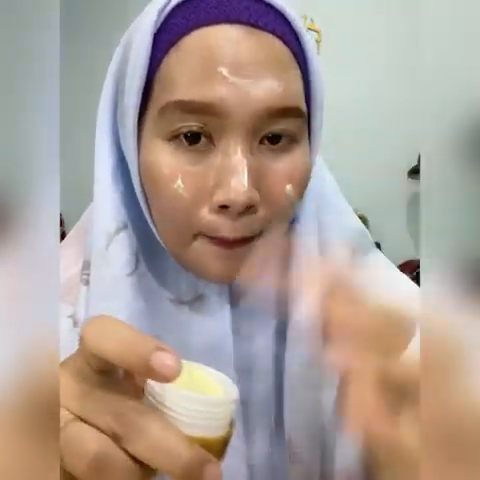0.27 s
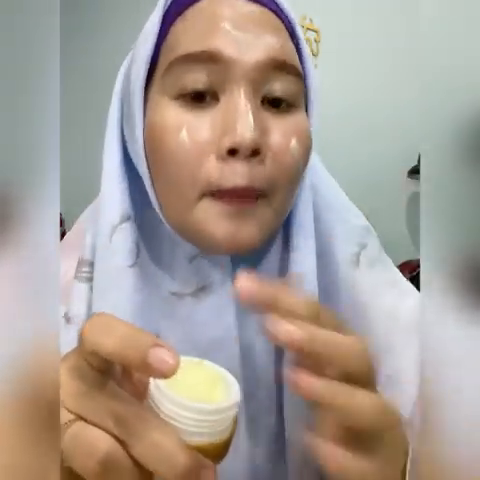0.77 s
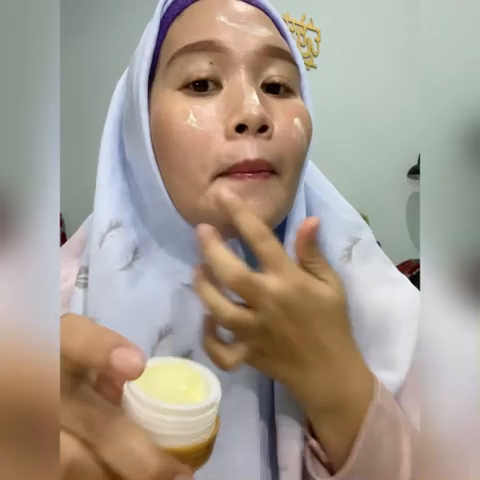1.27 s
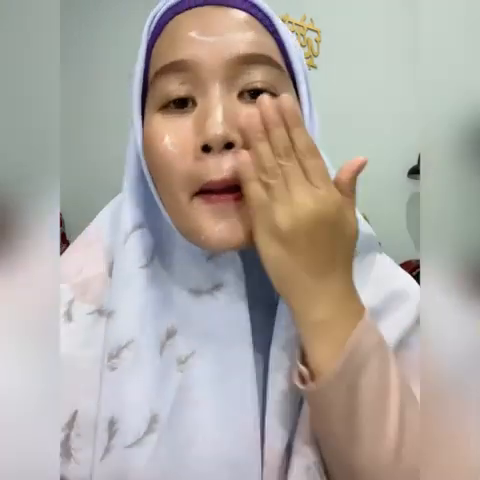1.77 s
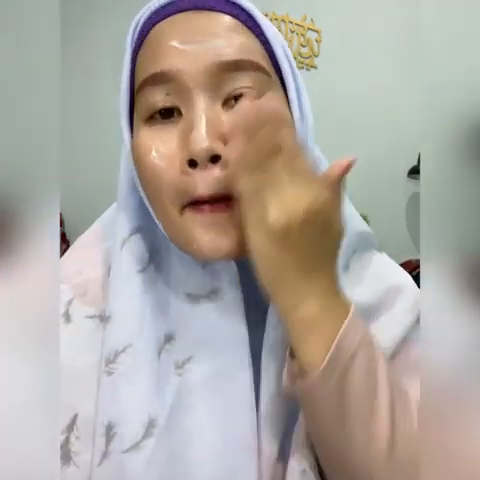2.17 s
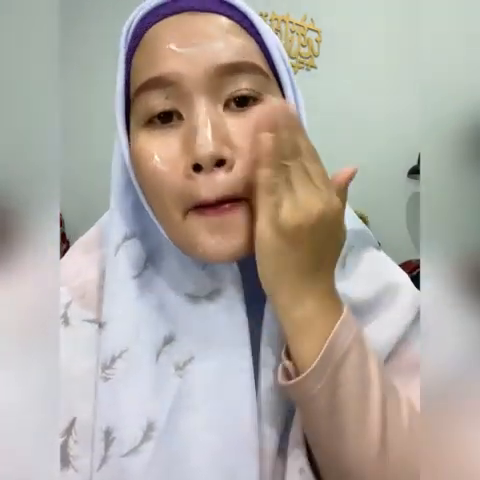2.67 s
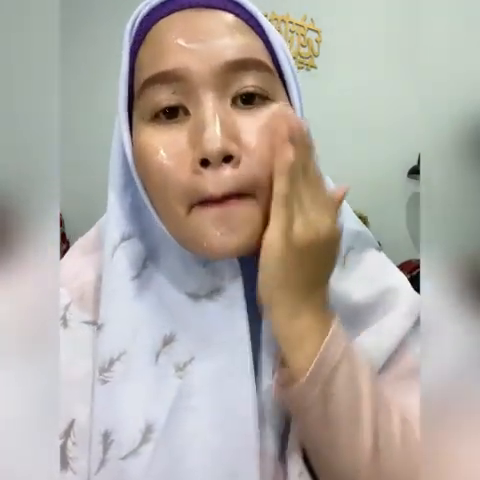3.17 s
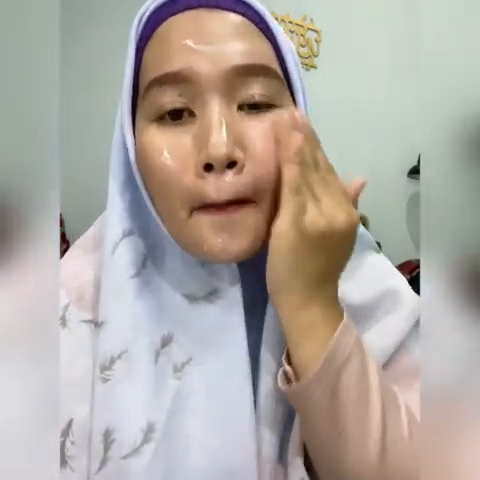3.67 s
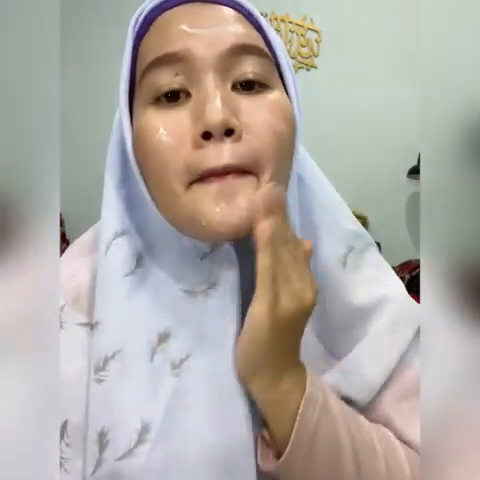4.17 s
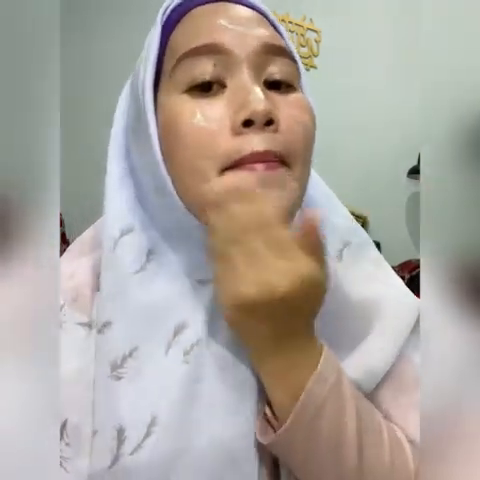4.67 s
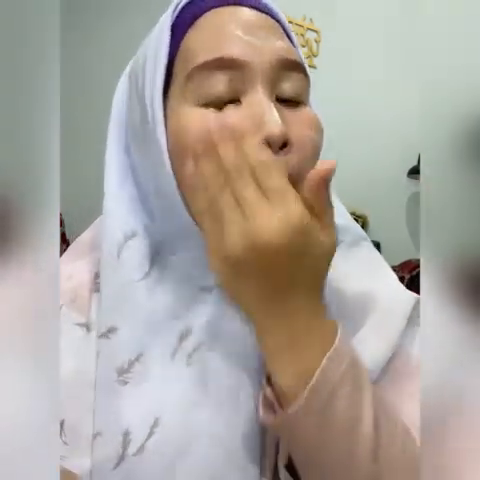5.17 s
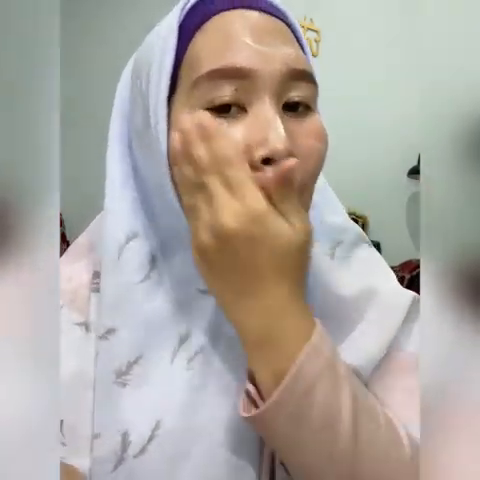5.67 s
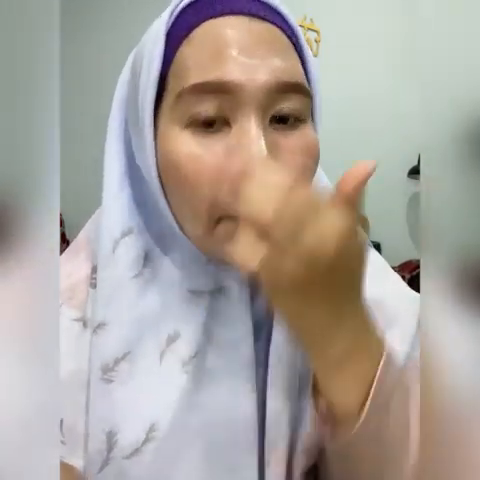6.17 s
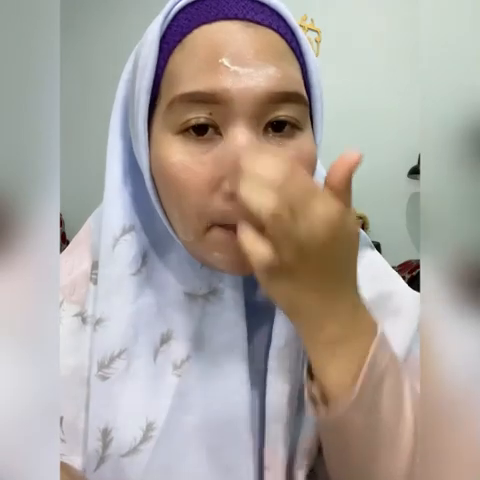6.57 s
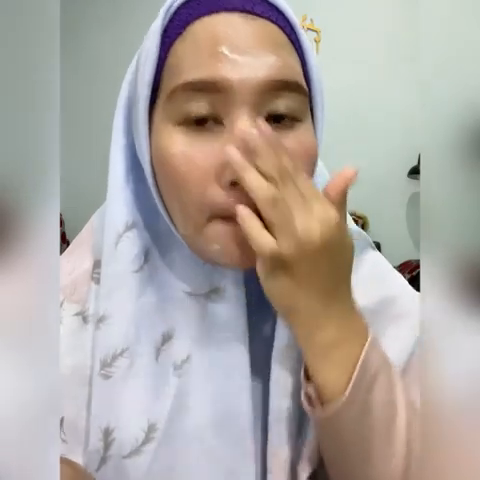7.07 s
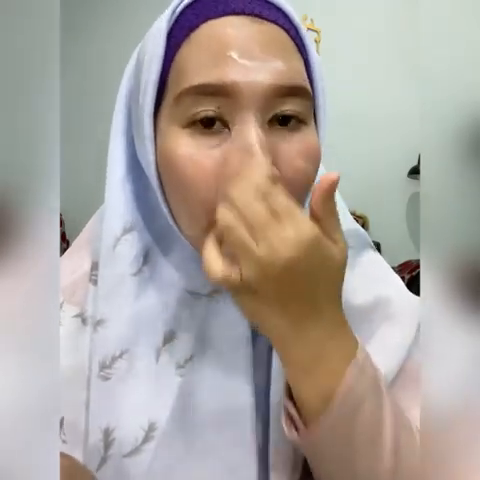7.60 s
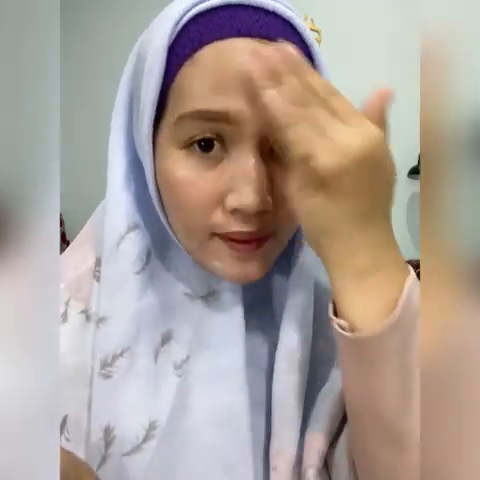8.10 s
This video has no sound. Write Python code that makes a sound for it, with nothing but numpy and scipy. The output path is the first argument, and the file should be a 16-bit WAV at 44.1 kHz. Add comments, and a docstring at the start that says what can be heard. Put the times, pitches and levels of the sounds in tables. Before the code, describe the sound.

Faint rubbing of cream on skin over a rhythmically squeaking fan, with a few sharp clacks and knocks from a plastic jar.

```python
"""A fan hums close by in a quiet room, its bearing squeaking and hissing about four times a second.
Fingers rub cream on skin with small sticky ticks, and cloth rustles. A little after two seconds
a small plastic jar rattles against its lid and knocks on a table; each hit makes them ring briefly.
Behind it all a rumble comes through the walls, with a low drone that swells now and then."""
import sys
import numpy as np
from scipy import signal
from scipy.fft import rfft, irfft, next_fast_len
from scipy.io import wavfile
from scipy.ndimage import map_coordinates

SR = 44100
rng = np.random.default_rng(int(sys.argv[2]) if len(sys.argv) > 2 else 0)


def bounce(signal):
    """Save signal as a 16-bit WAV file at the path given by the first command-line argument."""
    frames = np.transpose(np.atleast_2d(signal))
    limited = np.clip(frames, -1, 1)
    pcm = np.round(limited * 32767).astype(np.int16)
    wavfile.write(sys.argv[1], SR, pcm)


N = 367794
T = np.arange(N) / SR

# How one squeak slides down and fades: offset_s, pitch_hz, gain_db
SQUEAK_SHAPE = [(-.008, 3120, -24), (.004, 3120, -1.5), (.03, 3020, 2), (.045, 2950, -8.5),
                (.055, 2920, -22)]
def squeak():
    """The bearing sings one short, falling note that wavers a little."""
    when, pitch_hz, gain_db = np.transpose(SQUEAK_SHAPE)
    t = np.arange(when[0], when[-1], 1 / SR)
    waver_hz = 14 * map_coordinates(rng.standard_normal(12), [(t - t[0]) * 90])
    phase = 2 * np.pi * np.cumsum(np.interp(t, when, pitch_hz) + waver_hz) / SR
    return amp(np.interp(t, when, gain_db)) * np.sin(phase)

# The bearing's slightly uneven beat: start_s, level_db
SQUEAK_BEATS = [(-0.12, -55.5), (0.15, -57.5), (0.412, -57.5), (0.691, -57), (0.931, -57.5), (1.209, -57),
                (1.454, -56.5), (1.714, -57.5), (1.964, -55), (2.224, -57), (2.439, -56), (2.72, -56),
                (2.963, -56), (3.219, -57.5), (3.461, -57), (3.726, -57.5), (3.979, -57), (4.243, -57),
                (4.494, -55.5), (4.753, -58), (5.005, -57), (5.265, -57.5), (5.521, -56), (5.778, -57.5),
                (6.027, -57.5), (6.293, -57.5), (6.551, -57), (6.823, -57.5), (7.079, -57.5),
                (7.354, -57.5), (7.59, -56.5), (7.854, -58), (8.091, -56.5)]
# How the chatter rises and fades after a squeak: offset_s, gain_db
CHATTER_SHAPE = [(.03, -12), (.055, -9.5), (.09, -8.5), (.13, -13), (.17, -15.5), (.21, -17)]
# Tone of the chatter: pitch_hz, gain_db
CHATTER_TONE = [(2680, -27), (2780, -2.5), (2880, 5), (2980, -3.5), (3120, -15)]
# How the hiss rises and fades after a squeak: offset_s, level_db
HISS_SHAPE = [(0, -85), (.03, -69), (.06, -66.5), (.11, -67), (.17, -74.5), (.26, -102)]
# Tone of the hiss: pitch_hz, gain_db
HISS_TONE = [(7100, -23), (7400, -4), (7650, -3.5), (8000, -7), (8450, 0.5), (8650, -20)]
def bearing():
    """On each beat the fan's bearing squeaks, chatters a little lower and drags with a hiss."""
    squeaks, chatter, hiss = np.zeros((3, N))
    echo_s, echo_db = .112, -10.5  # a far wall sends the squeak back
    for beat, (start_s, level_db) in enumerate(SQUEAK_BEATS):
        note, note_s = squeak(), start_s + SQUEAK_SHAPE[0][0]
        add(squeaks, note_s, amp(level_db) * in_room(note, echo_db=-6, delay_s=.04))
        add(squeaks, note_s + echo_s, amp(level_db + echo_db) * note)
        accent_db = -1.5 if beat % 2 else 3.5  # every other chatter is stronger
        add(chatter, start_s + CHATTER_SHAPE[0][0], amp(level_db + accent_db) * fade(CHATTER_SHAPE))
        add(hiss, start_s, amp(.6 * rng.normal()) * fade(HISS_SHAPE))
    chatter *= noise(CHATTER_TONE)
    hiss *= amp(.92 * wobble(60)) * noise(HISS_TONE)
    return squeaks + chatter + hiss

# The motor's hum, at multiples of its lowest note: pitch_hz, level_db
MOTOR_NOTES = [(48.4, -57.5), (290.7, -74.5), (339.2, -87), (387.6, -73.5), (484.5, -83), (581.4, -78.5)]
# Tone of the moving air: pitch_hz, gain_db
AIR_TONE = [(76, -22), (130, 2), (223, -8), (400, -8.5), (585, -10), (700, -13), (1250, -17.5),
            (2150, -19.5), (2970, -8.5), (3300, -21), (4200, -26.5), (7900, -16), (11800, -29),
            (13500, -30), (15800, -41)]
# Narrow bands of high hiss: pitch_hz, width_hz, level_db
WHINE_BANDS = [(2630, 130, -85), (6060, 350, -76), (7540, 580, -76.5), (11300, 1200, -82)]
def fan():
    """The turning motor hums and the air rushes, with a thin whine on top."""
    out = np.zeros(N)
    for pitch_hz, level_db in MOTOR_NOTES:
        gain = np.sqrt(2) * amp(level_db + .7 * wobble(3.3))
        out += gain * np.sin(2 * np.pi * pitch_hz * T + .46 * wobble(1.974))
    out += amp(-63.5 + .32 * wobble(5)) * noise(AIR_TONE)
    for pitch_hz, width_hz, level_db in WHINE_BANDS:
        gain = amp(level_db + .8 * wobble(7.1))
        whine = filtered(rng.standard_normal(N), lambda hz: np.exp(-((hz - pitch_hz) / width_hz) ** 2))
        out += gain * unit(whine)
    return out

def jar():
    """The lid's rattle and the knocks together; small things give off no deep bass."""
    return filtered(lid_rattle() + table_knocks(), lambda hz: (1j * hz / (150 + 1j * hz)) ** 2)

def thread_catches(count, start_s, end_s):
    """The lid's screw thread scrapes in small uneven catches, listed like the clacks below."""
    progress = (np.arange(count) + rng.random(count)) / count
    levels_db = -39 - 4 * progress + 3 * rng.standard_normal(count)
    return [(start_s + (end_s - start_s) * p, db, -15) for p, db in zip(progress, levels_db)]

# Clacks of the jar against its lid: start_s, level_db, treble_db
LID_CLACKS = [(2.165, -43, -12), (2.174, -43, -14), (2.194, -43, -10), (2.2155, -34, -14),
              (2.259, -28.5, -11), (2.2658, -22, -9.5), (2.269, -12, -8), (2.2775, -26, -21),
              (2.283, -33, -8), (2.3042, -19.5, -1), (2.3066, -24.5, -1), (2.3128, -25.5, -17),
              (2.3177, -31, -18), (2.3262, -27, -9), (2.437, -41, -18), (2.455, -40.5, -14)]
# Notes the lid rings with: pitch_hz, gain_db, ring_s
LID_NOTES = [(690, -4, 0.023), (1130, -1.5, 0.021), (1487, 12.5, 0.011), (1600, -2.5, 0.015),
             (1925, 5.5, 0.022), (1984, -4, .05), (2270, -3, 0.027), (2720, -1, 0.015), (3260, -0.5, 0.027),
             (3960, -2, 0.0158), (5050, -4, .013), (6050, -9.5, 0.0083)]
def lid_rattle():
    """The lid scrapes, then clacks against the jar, ringing with short bright notes."""
    out, pitch_hz = np.zeros(N), np.array(LID_NOTES)[:, 0]
    for start_s, level_db, treble_db in LID_CLACKS + thread_catches(9, start_s=2.196, end_s=2.257):
        clack = ring(LID_NOTES, treble_db * (pitch_hz > 2500), attack_s=.00058, rough_db=8)
        add(out, start_s, amp(level_db) * in_room(clack, echo_db=-14, delay_s=.0068))
    return out

# Knocks of the jar on the table: start_s, level_db, bass_db, treble_db
TABLE_KNOCKS = [(.237, -59.5, -12, 7.5), (.904, -42.5, -21, -18), (2.496, -15.5, -5, 0),
                (2.542, -42, -9, 2), (2.673, -52.5, -22, -15), (2.7, -45, -18, -2), (2.724, -47, -15, 2),
                (2.780, -40, -11, -10), (2.783, -27.5, 2, 9.5), (2.787, -26.5, 5.5, -9),
                (3.629, -57.5, -10, 6), (5.722, -48, -13.5, -23.5), (7.743, -46.5, -18.5, -24),
                (8.101, -45, -15, 2)]
# Notes the table rings with: pitch_hz, gain_db, ring_s
TABLE_NOTES = [(227, -2, 0.09), (412, -5, 0.068), (433, -14.5, 0.31), (458, 2.5, 0.053), (671, 4, 0.027),
               (799, -1, 0.041), (1142, 3.5, 0.024), (1630, -8, 0.027), (1980, -9, 0.029),
               (2520, -5.5, 0.0098)]
def table_knocks():
    """The jar hits the table, which rings lower than the lid."""
    out, pitch_hz = np.zeros(N), np.array(TABLE_NOTES)[:, 0]
    treble_share = np.clip((pitch_hz - 500) / 600, 0, 1)
    for start_s, level_db, bass_db, treble_db in TABLE_KNOCKS:
        boost_db = bass_db * (pitch_hz < 300) + treble_db * treble_share
        knock = ring(TABLE_NOTES, boost_db, attack_s=.00073, rough_db=-5)
        add(out, start_s, amp(level_db) * in_room(knock, echo_db=-9.5, delay_s=.013))
    return out

# Strokes of the hand: middle_s, length_s, skin_db, cloth_db
HAND_STROKES = [(.17, .2, -70, -67), (.7, .12, -69, -76), (1.16, .14, -69, -69), (1.57, .24, -64.5, -67),
                (1.64, .26, -80, -65), (1.95, .3, -64.5, -67), (2.29, .1, -64, -72), (2.58, .14, -65, -70),
                (2.76, .1, -63.5, -66), (3.11, .13, -68, -68), (3.3, .13, -70, -71), (3.68, .13, -68, -73),
                (3.99, .18, -67, -65), (4.22, .14, -72, -72), (4.57, .13, -69, -73), (4.98, .3, -69, -68),
                (5.27, .13, -66, -72), (5.58, .12, -74, -70), (5.9, .16, -67, -69), (6.13, .13, -74, -71),
                (6.65, .12, -72, -80), (7.05, .15, -67, -70), (7.22, .14, -68, -71), (7.5, .13, -72, -78),
                (7.74, .26, -72, -65), (7.9, .1, -71, -71), (8.13, .1, -71, -69), (8.28, .1, -71, -73)]
# Light touch on the skin between strokes: time_s, level_db
RESTING_TOUCH = [(0, -82), (1.2, -80), (1.6, -73), (5.9, -75), (6.4, -79), (7.2, -75), (8.34, -77)]
# Tone of rubbed skin: pitch_hz, gain_db
SKIN_TONE = [(1500, -40), (3500, -2), (5000, -2.5), (9000, -2.5), (12000, -0.5), (13500, -13), (15800, -8)]
# Tone of rustling cloth: pitch_hz, gain_db
CLOTH_TONE = [(300, -26.5), (700, -3.5), (1000, 0.5), (1350, -3), (1800, 0.5), (2400, -6), (4000, -4),
              (5500, -10.5), (7500, -20.5)]
def rubbing():
    """Skin and cloth hiss with each stroke; a fast, uneven grip makes the sound grainy."""
    middle_s, length_s, skin_db, cloth_db = np.transpose(HAND_STROKES)
    skin = unit(amp(1.8 * wobble(130)) * noise(SKIN_TONE))
    cloth = unit(amp(2.4 * wobble(80)) * noise(CLOTH_TONE))
    skin *= swells(middle_s, length_s, skin_db, rest_db=curve(RESTING_TOUCH))
    cloth *= swells(middle_s, length_s, cloth_db, rest_db=-79)
    return skin + cloth

# Ticks of fingers in cream, and the sharp crack at the jar's hardest knocks: start_s, peak_db, pitch_hz
TICKS = [(.145, -48, 5000), (.506, -48, 5500), (.531, -52, 3500), (.546, -52, 9000),
         (.904, -54, 4100), (1.424, -49, 11000), (1.433, -41, 10000), (1.445, -49, 5000),
         (1.913, -48, 10000), (1.975, -47, 4710), (2.134, -53, 11500), (2.268, -42, 7540),
         (2.305, -34, 6400), (2.497, -33, 5510), (2.589, -48, 10500), (2.786, -36, 4040),
         (3.311, -51, 12000), (5.123, -44, 10000), (5.124, -52, 1200), (5.127, -45, 6000),
         (5.179, -43, 12500), (5.25, -51, 11500), (7.018, -47, 11600), (7.899, -43, 10500),
         (8.014, -53, 10600), (8.057, -48, 4500), (8.101, -38.5, 3300), (8.12, -47, 5000),
         (8.1228, -36, 7500)]
def small_ticks():
    """Sticky fingers, and the jar's hardest knocks, make tiny bursts of noise, each strongest around one pitch."""
    out, t = np.zeros(N), np.arange(512) / SR
    fade_s = .0077
    for start_s, peak_db, pitch_hz in TICKS:
        burst = amp(-60 * t / fade_s) * rng.standard_normal(len(t))
        width_hz = .7 * pitch_hz
        band = lambda hz: (1j * hz * width_hz / (pitch_hz ** 2 - hz ** 2 + 1j * hz * width_hz)) ** 2
        tick = filtered(burst, band)
        add(out, start_s, amp(peak_db) * tick / np.abs(tick).max())
    return out

# Tone of the rumble: pitch_hz, gain_db
RUMBLE_TONE = [(25, -30.5), (40, -24), (52, -10.5), (65, 4.5), (90, -4.5), (120, -7.5), (180, -16),
               (260, -27)]
# Slow drift of the rumble's loudness: time_s, level_db
RUMBLE_DRIFT = [(0, -56), (1, -55), (1.8, -57), (2.8, -55.5), (4.6, -58.5), (5.6, -58), (7.6, -59),
                (8.34, -58)]
# Swells of the drone: middle_s, length_s, peak_db
DRONE_SWELLS = [(3.2, .3, -60), (3.95, .2, -59), (5.49, .19, -51), (6.16, .19, -49.5), (6.83, .2, -50),
                (8.2, .2, -58)]
def outside(drone_hz=85):
    """A deep rumble and one low, swelling note come through the walls."""
    drone = np.sqrt(2) * np.sin(2 * np.pi * drone_hz * T + 1.16 * wobble(5.2))
    rumble = amp(curve(RUMBLE_DRIFT) + 1.5 * wobble(4.5)) * noise(RUMBLE_TONE)
    return rumble + swells(*np.transpose(DRONE_SWELLS), rest_db=-68) * drone

# How long the room takes to fade by 60 dB: pitch_hz, ring_s
ROOM_RING = [(200, 0.51), (1000, 0.57), (3000, 0.46), (10000, 0.44)]
def in_room(sound, echo_db, delay_s):
    """Add the walls' echo, which builds up after a delay; each pitch fades at its own speed."""
    hz, t, spectrum = signal.stft(rng.standard_normal(SR // 2), SR, nperseg=256)
    spectrum *= amp(-60 * t / at_pitch(ROOM_RING, hz)[:, None])
    echo = signal.istft(spectrum, SR, nperseg=256)[1]
    echo *= 1 - np.exp(-(np.arange(len(echo)) / SR / delay_s) ** 4)
    echo *= amp(echo_db) / np.linalg.norm(echo)
    echo[0] = 1  # the sound that arrives directly
    return signal.fftconvolve(sound, echo)

def ring(notes, boost_db, attack_s, rough_db):
    """A struck object: each note is roughened by noise and fades by 60 dB in its ring_s."""
    t = np.arange(SR // 5) / SR
    pitch_hz, gain_db, ring_s = np.transpose(notes)[:, :, None]
    grit = signal.fftconvolve(rng.standard_normal((len(notes), len(t))), np.hanning(60)[None] / 30, "same")
    decay = amp(gain_db + rng.normal(0, 1, gain_db.shape) - 60 * t / ring_s)
    onset = 1 - np.exp(-(t / attack_s) ** 2)
    clean = onset * decay * np.sin(2 * np.pi * pitch_hz * t)
    rough = amp(boost_db)[:, None] * clean * (1 + amp(rough_db) * grit)
    return rough.sum(0) / np.abs(clean.sum(0)).max()

def amp(db):
    """Turn decibels into a number to multiply by."""
    return 10 ** (np.asarray(db) / 20)

def unit(sound):
    """Scale a sound to an average power of 1."""
    return sound / np.sqrt(np.mean(sound ** 2) + 1e-20)

def at_pitch(rows, hz):
    """Read between (pitch_hz, value) rows, with octaves evenly spaced."""
    pitches, values = np.transpose(rows)
    return np.interp(np.log(hz + 1), np.log(pitches + 1), values)

def curve(rows):
    """Join (time_s, value) rows into a line across the whole scene."""
    return np.interp(T, *np.transpose(rows))

def fade(rows):
    """A short loudness shape from (offset_s, gain_db) rows."""
    when, gain_db = np.transpose(rows)
    return amp(np.interp(np.arange(when[0], when[-1], 1 / SR), when, gain_db))

def swells(middle_s, length_s, peak_db, rest_db):
    """Bell-shaped rises in loudness above a resting level; their powers add."""
    power = sum(amp(2 * db) * np.exp(-8 * ((T - middle) / length) ** 2)
                for middle, length, db in zip(middle_s, length_s, peak_db))
    return np.sqrt(power + amp(2 * rest_db))

def wobble(per_s):
    """A smooth curve through per_s random values a second."""
    return map_coordinates(rng.standard_normal(int(N * per_s / SR) + 4), [T * per_s])

def filtered(sound, gain_at):
    """Turn each pitch up or down by gain_at(hz)."""
    size = next_fast_len(len(sound) + 8192)
    return irfft(rfft(sound, size) * gain_at(np.fft.rfftfreq(size, 1 / SR)), size)[:len(sound)]

def noise(tone):
    """Noise of power 1 shaped by (pitch_hz, gain_db) rows, silent outside their range."""
    inside = lambda hz: (hz > tone[0][0]) & (hz < tone[-1][0])
    return unit(filtered(rng.standard_normal(N), lambda hz: amp(at_pitch(tone, hz)) * inside(hz)))

def add(out, start_s, sound):
    """Mix a sound into out, beginning at start_s."""
    i = round(start_s * SR)
    sound = sound[max(-i, 0):][:N - max(i, 0)]
    out[max(i, 0):][:len(sound)] += sound

def scene():
    """All the sources together in one channel."""
    return (fan() + bearing() + outside() + rubbing() + jar() + small_ticks())[None]

# Tone of the microphone: pitch_hz, gain_db
MIC_TONE = [(20, -0.5), (11500, 0), (13500, -3.5), (15800, -6.5)]
def record(dry):
    """The microphone loses the deepest bass, dulls the treble and hears nothing above top_hz."""
    bottom_hz, top_hz = 38.4, 15750
    bass_cut = lambda hz: 1 / np.sqrt(1 + (bottom_hz / (hz + 1)) ** 8)
    return filtered(dry[0], lambda hz: (hz < top_hz) * bass_cut(hz) * amp(at_pitch(MIC_TONE, hz)))[None]

dry = scene()
out = record(dry)
bounce(out)
```